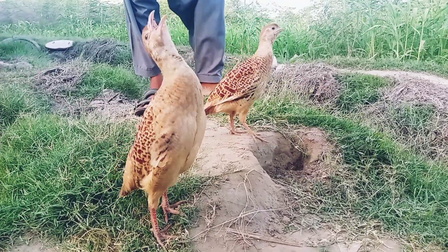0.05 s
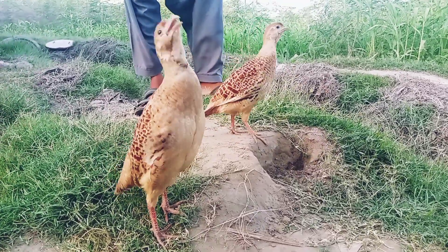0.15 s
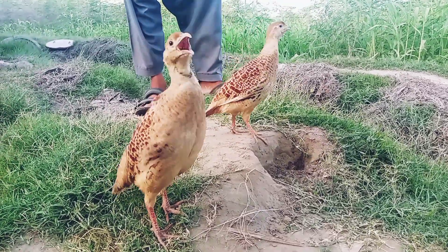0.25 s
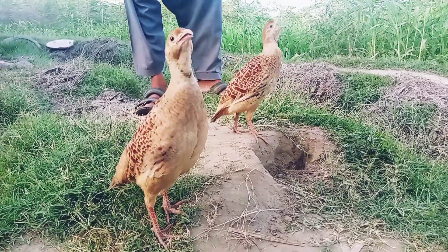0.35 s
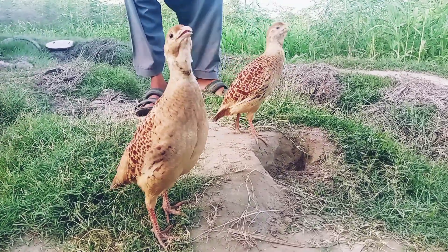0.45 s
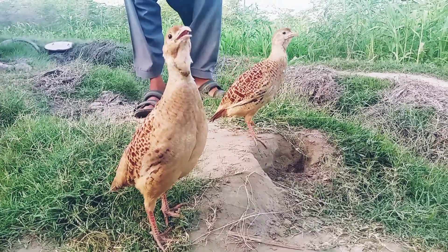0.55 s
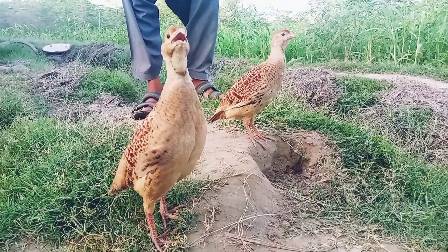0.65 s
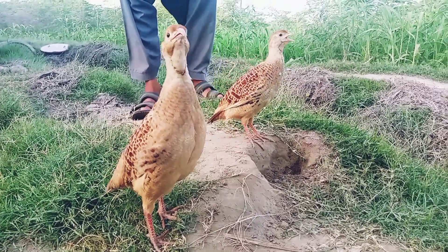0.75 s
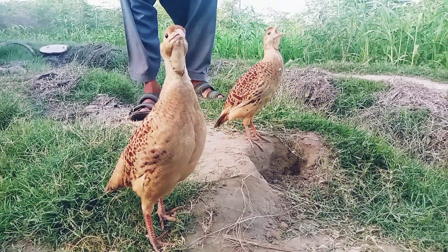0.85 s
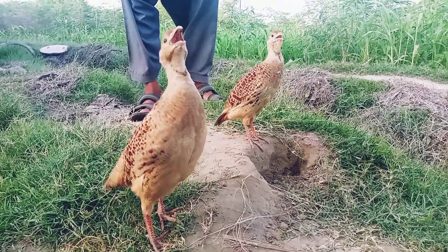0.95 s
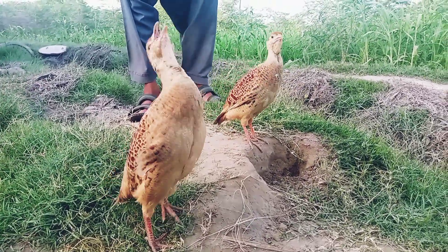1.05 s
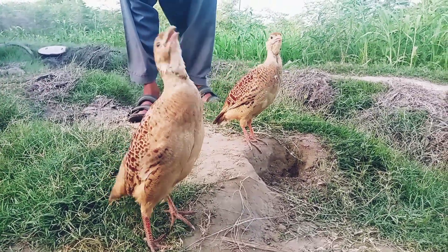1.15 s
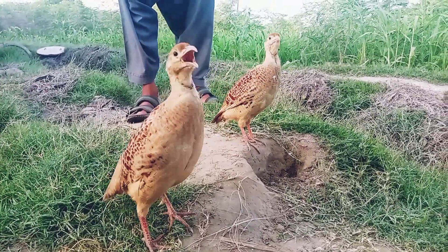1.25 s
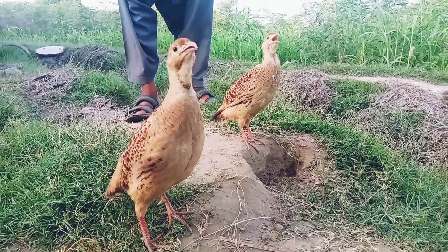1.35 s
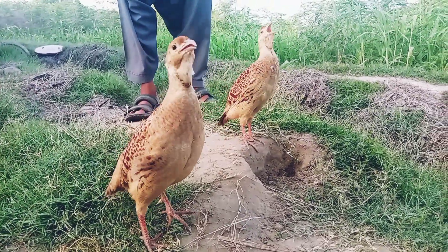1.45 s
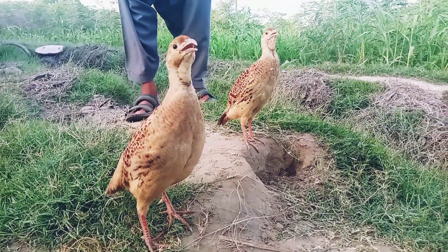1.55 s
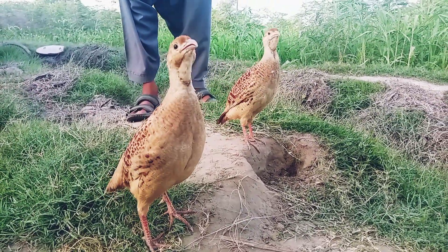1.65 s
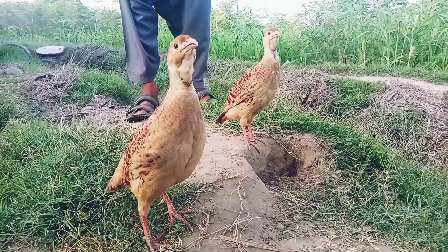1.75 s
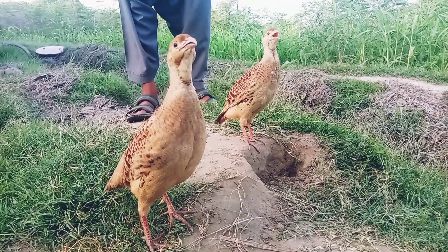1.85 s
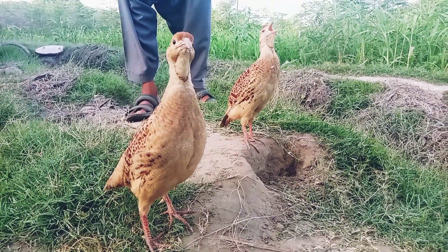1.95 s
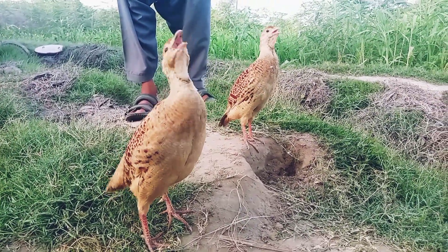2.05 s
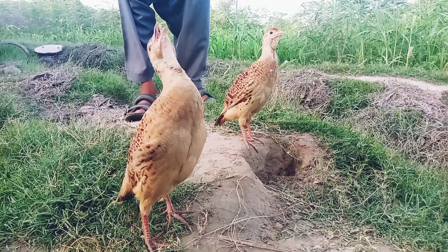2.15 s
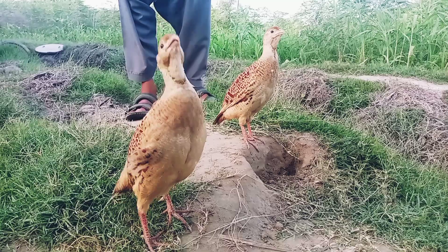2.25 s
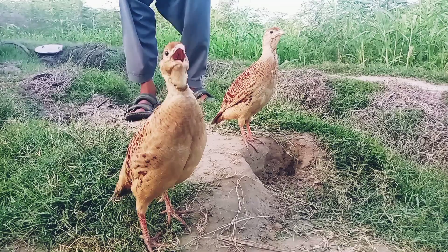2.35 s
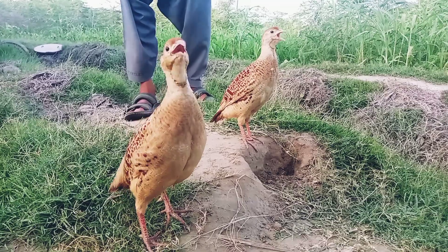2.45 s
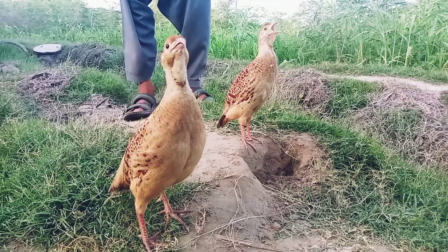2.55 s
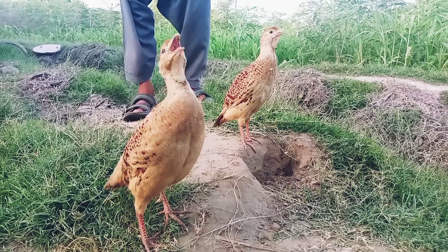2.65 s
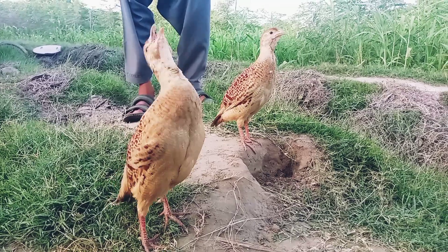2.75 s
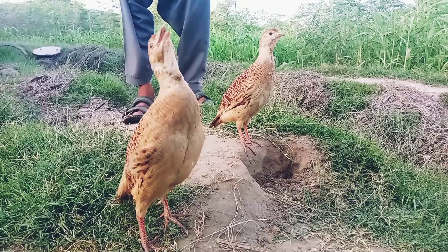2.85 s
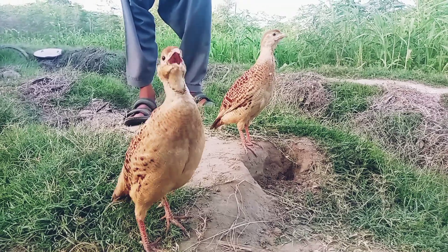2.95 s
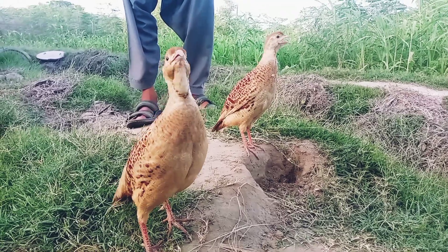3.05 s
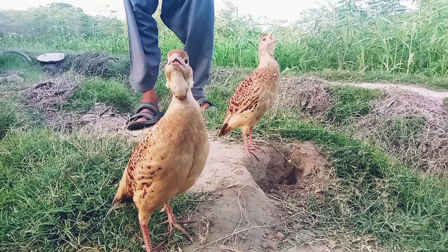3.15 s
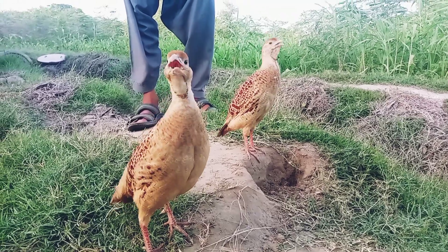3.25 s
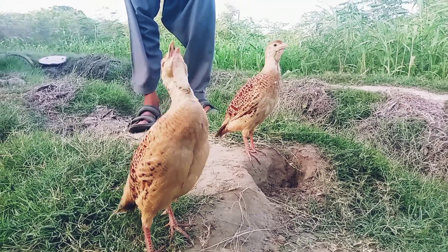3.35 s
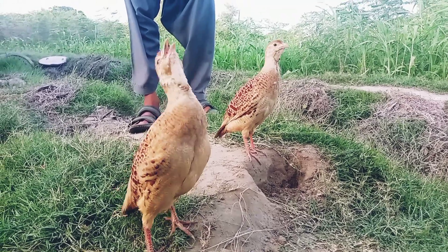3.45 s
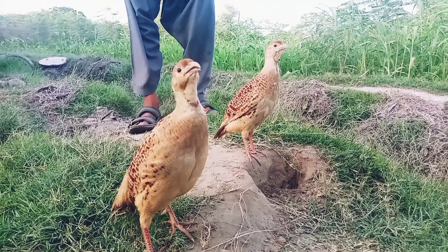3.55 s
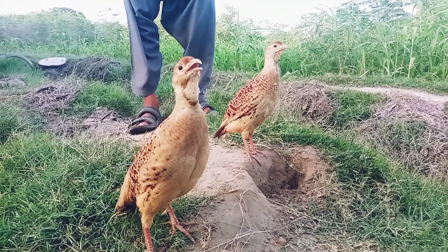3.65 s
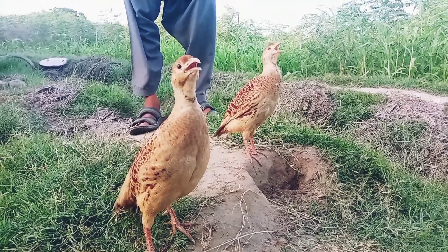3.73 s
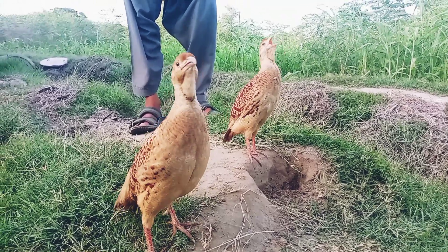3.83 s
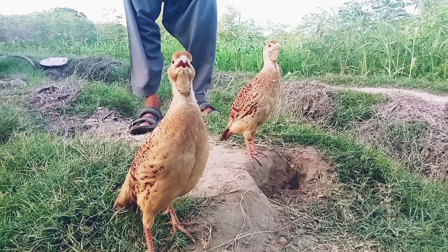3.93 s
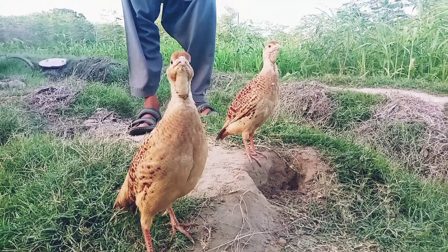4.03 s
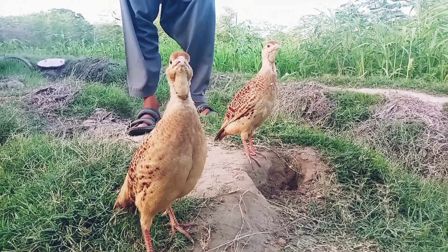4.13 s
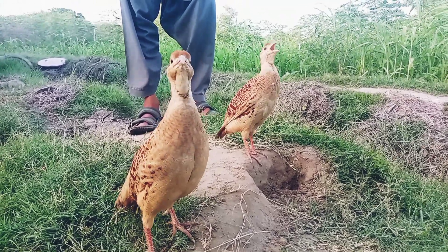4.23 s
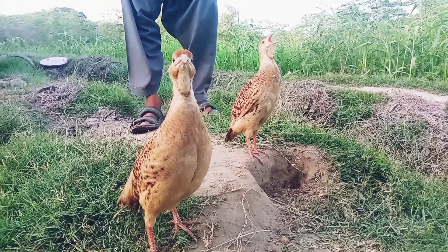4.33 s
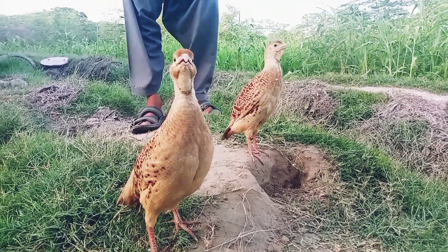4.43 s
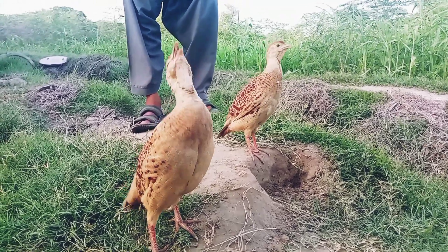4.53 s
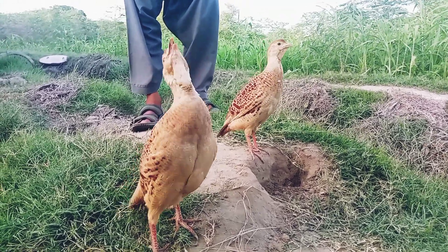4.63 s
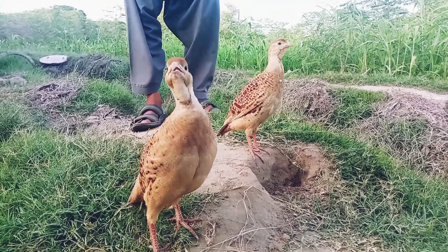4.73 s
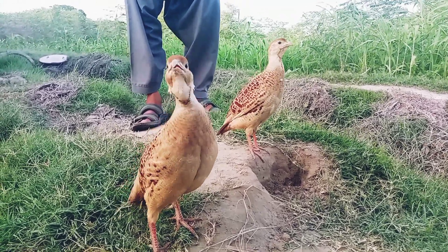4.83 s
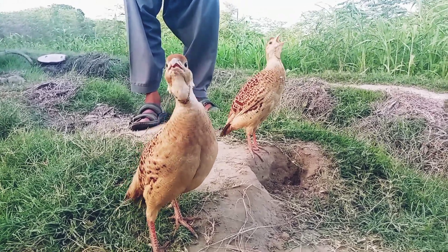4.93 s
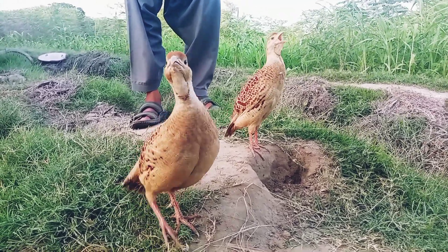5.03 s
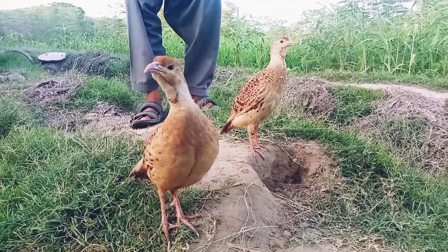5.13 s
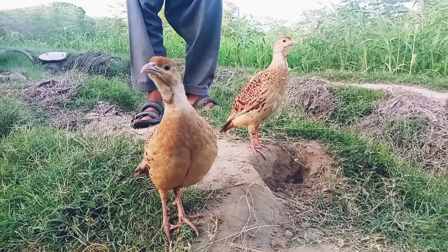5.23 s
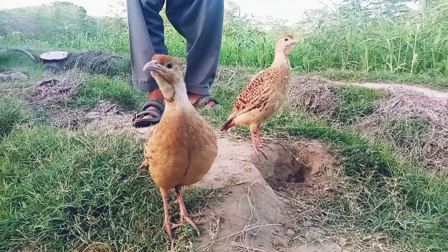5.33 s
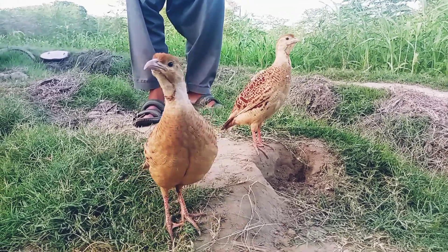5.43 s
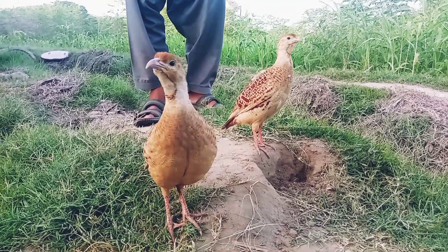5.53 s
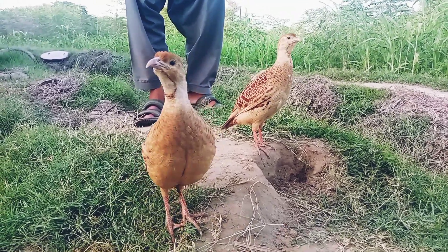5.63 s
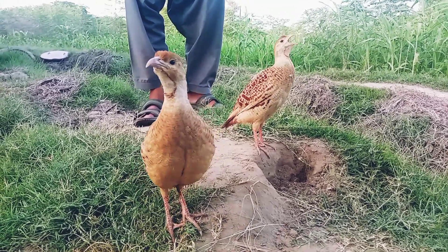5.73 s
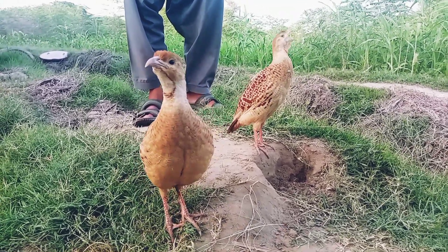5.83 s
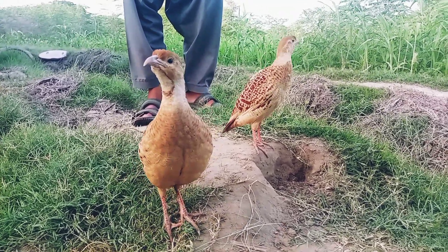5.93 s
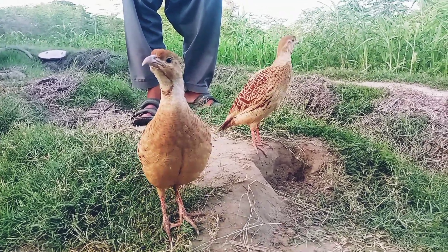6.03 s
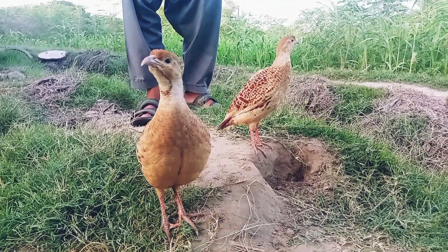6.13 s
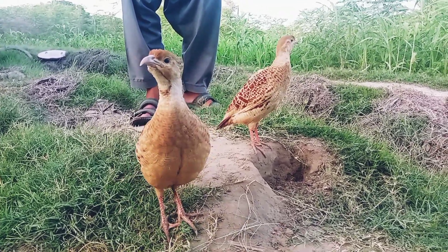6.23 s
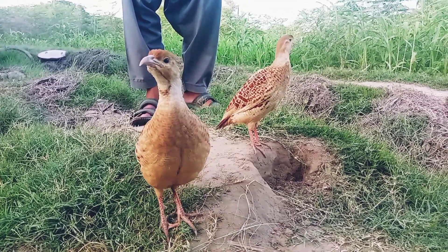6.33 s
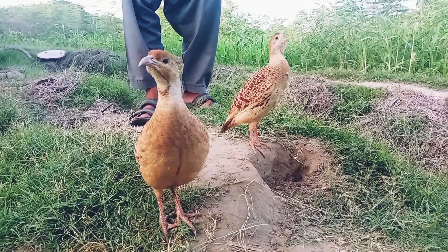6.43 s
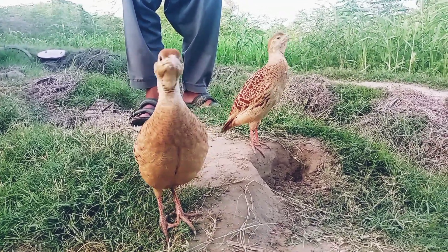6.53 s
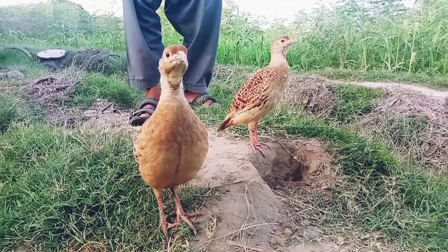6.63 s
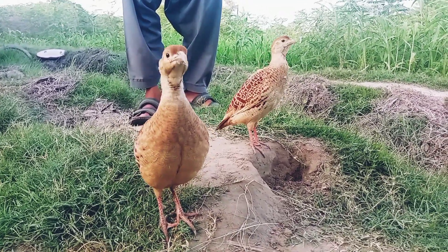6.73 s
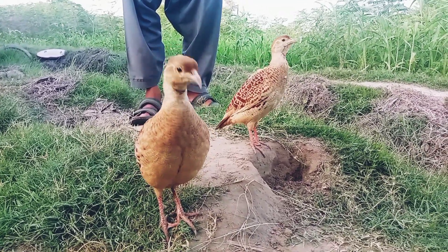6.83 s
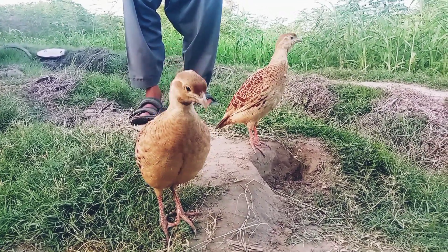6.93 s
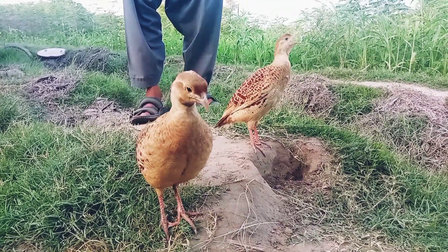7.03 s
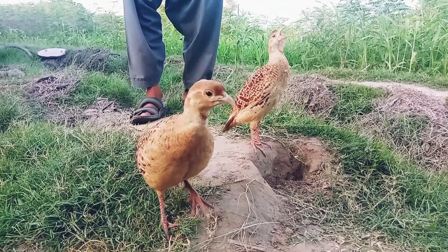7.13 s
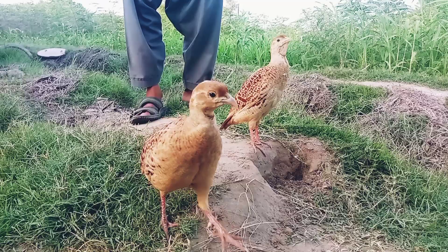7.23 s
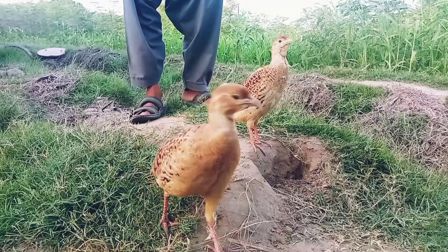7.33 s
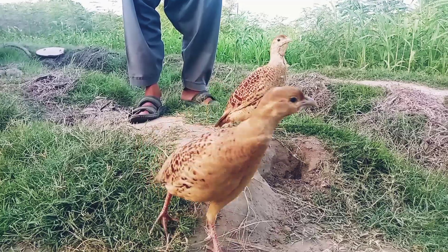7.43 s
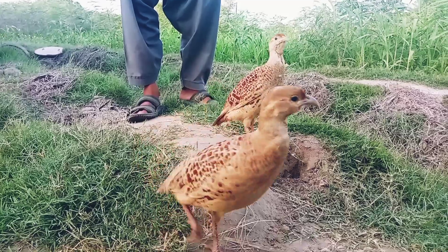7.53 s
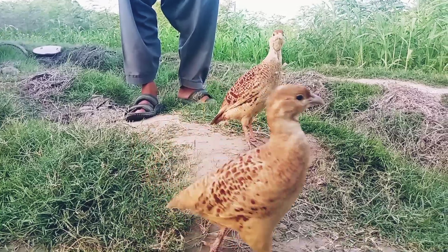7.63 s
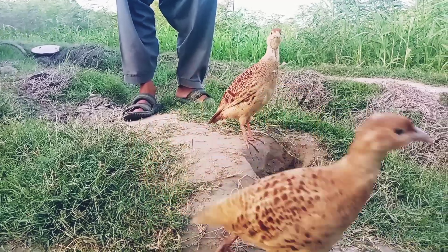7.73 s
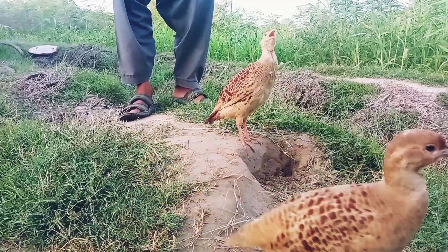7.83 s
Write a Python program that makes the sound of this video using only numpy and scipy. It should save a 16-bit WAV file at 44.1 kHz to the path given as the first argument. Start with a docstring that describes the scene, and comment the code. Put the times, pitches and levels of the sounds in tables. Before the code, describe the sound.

Loud, piercing partridge-like duet outdoors: a near bird's fast cackling phrases over a partner's sharp level notes, which continue alone, each led by a whistle.

```python
"""Francolin duet

Two francolins call on a grassy field bank, each loud note a rasp that snaps into a clean tone.
Near bird: a repeated phrase of a long falling note, short falling notes and low pulsed grunts.
Partner: sharp level notes, later alone and slower, each led by a thin whistle; one more whistle ends.
Syrinx notes are locked harmonics plus noisy membrane slaps; whistles, peeps and hums are gliding sines.
Scattered echo, open air, lumpy low rumble and intermittent hiss are shaped noise."""
import sys
import numpy as np
from scipy import signal
from scipy.fft import rfft, irfft, next_fast_len
from scipy.io import wavfile
from scipy.ndimage import uniform_filter1d, minimum_filter1d, map_coordinates

SR = 44100
rng = np.random.default_rng(int(sys.argv[2]) if len(sys.argv) > 2 else 0)


def pcm_store(signal):
    """Save signal as 16-bit PCM."""
    levels = np.round(np.clip(np.atleast_2d(signal), -1, 1) * 32767)
    wavfile.write(sys.argv[1], SR, levels.astype(np.int16).T)


N = 347508
TIME_S = np.arange(N) / SR

# long notes: snap t/s, length/s, opening yelp level/dB re LONG_DB
LONG_NOTES = [(.076, 0.11, -3), (1.101, 0.11, -23.5), (2.153, 0.11, -27), (2.783, 0.12, -18.5),
              (3.431, 0.12, -26), (4.616, 0.11, -22.5)]
# short notes: snap t/s, starting f/Hz, fundamental level/dB before its swell
SHORT_NOTES = [(.337, 1975, -17.5), (0.475, 1734, -18.5), (.6, 1721, -14.5), (.727, 1580, -23),
               (0.857, 1450, -23), (1.361, 1943, -17.5), (1.492, 1730, -22), (1.656, 1520, -24),
               (2.41, 1943, -17.5), (2.544, 1733, -21), (3.058, 1972, -19.5), (3.188, 1800, -21),
               (3.697, 1916, -18), (3.831, 1730, -20.5), (4.873, 1872, -17.5), (4.999, 1653, -23)]
# grunts: t/s, length/s, nominal pulse rate/Hz (arched from x0.5 to x1.05), level/dB
GRUNTS = [(.695, 0.075, 730, -21.5), (0.826, 0.06, 700, -24.5), (1.613, 0.083, 790, -23.5),
          (1.741, 0.074, 680, -23.5), (1.872, 0.066, 500, -31.5), (3.995, .078, 730, -23),
          (4.137, .086, 600, -25.5), (4.304, 0.064, 320, -41.5), (5.118, 0.073, 670, -29),
          (5.239, 0.064, 500, -31), (5.366, 0.077, 360, -42)]
# partner's sharp notes: snap t/s, length/s, f/Hz, fundamental level/dB
SHARP_NOTES = [(0.41, 0.086, 2348, -26), (.915, .088, 2358, -40), (1.509, 0.09, 2352, -35.5),
               (1.995, 0.089, 2323, -38), (2.566, 0.094, 2315, -31.5), (3.208, .09, 2323, -35),
               (3.852, 0.098, 2326, -31), (4.372, 0.085, 2310, -36.5), (5.031, 0.092, 2324, -34),
               (5.833, 0.095, 2307, -25), (6.497, 0.086, 2323, -32), (7.172, 0.087, 2307, -30.5)]
# partner's throat resonance, lower once it calls alone: t/s, f/Hz
PARTNER_THROAT = [(.4, 7900), (2, 8500), (5.1, 8550), (5.8, 7205)]
# thin whistles: t/s, length/s, start f/Hz, end f/Hz, level/dB
WHISTLES = [(5.502, 0.14, 2427, 2680, -49), (5.634, 0.14, 2678, 2734, -23), (6.295, .148, 2716, 2745, -20),
            (6.302, 0.16, 2220, 2370, -39), (6.963, 0.15, 2753, 2763, -23.5),
            (7.787, 0.18, 2728, 2802, -20.5)]
# soft rising peeps: t/s
PEEPS = [6.785, 7.397, 7.608]
# soft low hums: t/s, mean f/Hz, level/dB
HUMS = [(.23, 325, -61.5), (2.26, 227.5, -66.5), (2.7, 238, -65), (2.92, 218, -60), (3.74, 220, -60),
        (3.939, 339.6, -53.5), (5.35, 333.6, -49.5), (5.69, 216, -53)]

# overtones: multiple of the pitch, level/dB re the note's overtone level
LONG_OVERTONES = [(2, 3), (3, -4), (4, -10.5), (5, -29.5), (6, -50)]
SHORT_OVERTONES = [(2, -7), (3, 2.5), (4, -5.5), (5, -18), (6, -30), (7, -40.5)]
SHARP_OVERTONES = [(1.5, -41.5), (2, 0), (2.5, -38), (3, -17), (3.5, -52), (4, -23.5), (5, -38.5), (6, -56)]

# spectra of rasps and grunts: f/Hz, level/dB per Hz (relative)
NEAR_RASP = [(60, -70), (400, -41), (700, -32), (950, -15), (1300, -15.5), (2200, -4.5), (3100, 4.5),
             (3800, -6.5), (5100, -2), (6400, -9.5), (7600, -6), (9000, -17), (10200, -36.5),
             (12500, -51.5), (15500, -44)]
SHARP_RASP = [(60, -70), (450, -37.5), (610, -24.5), (800, -34), (1100, -21.5), (1750, -18.5), (2150, 3),
              (3050, -4.5), (4350, -3), (5000, -7.5), (7100, -3.5), (7900, -28), (8800, -26), (9600, -15.5),
              (10400, -32.5), (13000, -54.5), (15300, -39)]
GRUNT_COLOUR = [(50, -65), (220, -26.5), (340, -9), (550, -24.5), (760, -20), (1200, 2), (2100, 0),
                (3600, -30), (4300, -15), (5100, -16), (6500, -36.5), (15000, -59.5)]

# mean level of the low rumble: t/s, level/dB
RUMBLE_LEVEL = [(0.0, -65), (0.17, -78), (0.74, -60), (0.83, -73.5), (2.94, -71.5), (2.98, -55),
                (3.31, -72.5), (3.36, -47.5), (3.49, -88), (3.6, -49), (3.93, -71), (4.02, -51.5),
                (4.74, -71), (4.78, -52.5), (5.13, -71.5), (5.22, -60.5), (7.42, -69), (7.88, -54)]
# level of the faint hiss: t/s, level/dB
HISS_LEVEL = [(6.14, -75), (6.2, -56), (6.8, -83), (6.96, -60.5), (7.55, -79.5), (7.62, -59.5)]
# spectra of open air, hiss, rumble: f/Hz, level/dB per Hz (relative)
AIR_COLOUR = [(30, -27), (220, -15), (450, -22.5), (1000, -23), (2000, -8.5), (2800, -24.5), (15000, -43.5)]
HISS_COLOUR = [(200, -11), (2000, 0), (3200, -7.5), (7000, -5.5), (10000, -35)]
RUMBLE_COLOUR = [(20, -38), (65, -9.5), (87, 4), (110, -9.5), (220, -20), (700, -70.5)]
# spectrum of the echo tail: f/Hz, level/dB per Hz (relative)
TAIL_COLOUR = [(300, -4), (1200, -6.5), (2330, 4), (3200, -12.5), (4500, -19), (5200, -13),
               (8000, -14.5), (14000, -26.5)]

SNAP_S, UNLOCK_S = .012, .016   # 60 dB attack and release of a locked tone
# long note; leads are times before the snap
LONG_HZ, LONG_DB = 2097, -9.5
LONG_LEAD_S, YELP_LEAD_S, YELP_HALF_S = .056, .034, .008
YELP_PITCH_SHARE = .96
BREAK_FROM_S, BREAK_TO_S = .03, .057
LONG_FALL_FROM_S, LONG_FALL_SHARE = .065, .21
# short note; the slide fades near STALL_HZ and stops there
SHORT_LEAD_S, SHORT_FADE_S, STALL_HZ = .032, .017, 1250
SHORT_FALL_FROM_S, SHORT_FALL_PER_S = .007, 11.44   # rate at full effort
FULL_EFFORT_HZ = 2020
SLACK_LOSS_DB = 373   # per squared share of pitch off full effort
# sharp note; starts slightly high and settles
SHARP_DB, SHARP_LEAD_S = -11, .034
SHARP_OVERSHOOT_SHARE, SHARP_SETTLE_S = .005, .012
USUAL_FUNDAMENTAL_DB = -33
OVERTONE_TRADE = .2   # overtone dB lost per dB of extra fundamental
# soft tones
CHEST_FROM_HZ, CHEST_TO_HZ, CHEST_DB = 385, 320, -30   # level re the grunt
PEEP_S, PEEP_FROM_HZ, PEEP_TO_HZ, PEEP_DB = .058, 1310, 1660, -50.5
HUM_S = .1
# surroundings and output
AIR_DB, TAIL_T60_S, CUTOFF_HZ = -63, .47, 15900


def from_db(db):
    """Decibels to gain."""
    return 10 ** (np.asarray(db) / 20)


def rms_one(x):
    """Scale to rms 1."""
    return x / np.sqrt(np.mean(x ** 2) + 1e-20)


def follow(rows, t):
    """Interpolate each column of a curve at times t."""
    knots_s, *columns = np.transpose(rows)
    knots_s = np.maximum.accumulate(knots_s)
    return [np.interp(t, knots_s, column) for column in columns]


def coloured(x, spectrum):
    """Filter x by a spectrum of f/Hz, level/dB points; rms 1."""
    hz, db = np.transpose(spectrum)
    size = next_fast_len(2 * len(x))
    bins_hz = np.maximum(np.fft.rfftfreq(size, 1 / SR), 1)
    gain = from_db(np.interp(np.log(bins_hz), np.log(hz), db))
    return rms_one(irfft(rfft(x, size) * gain, size)[:len(x)])


def drift(t, rate_hz):
    """Smooth random curve with spread near 1."""
    knots = (t - t[0]) * rate_hz
    values = rng.standard_normal(int(knots[-1]) + 2)
    return map_coordinates(values, [knots], order=3, mode="nearest")


def add(out, start_s, sound):
    """Mix a sound in at its time."""
    i = max(round(start_s * SR), 0)
    out[i:i + len(sound)] += sound[:max(N - i, 0)]


def held(t, start, end, attack_s, release_s):
    """Level in dB: 0 from start to end, -60 one attack before and one release after."""
    return -60 * (np.maximum(start - t, 0) / attack_s + np.maximum(t - end, 0) / release_s)


def bump(t, centre, width):
    """Smooth swell of height 1."""
    return np.exp(-((t - centre) / width) ** 2)


def since(t, start, bend_s):
    """Time elapsed since start, with a rounded corner."""
    return bend_s * np.logaddexp(0, (t - start) / bend_s)


def loudest(*levels):
    """Highest of several levels at each moment."""
    return np.max(levels, axis=0)


def flutter(t, per_s, jitter, wander_hz, uneven_db, air):
    """Membranes slap at a wandering rate and uneven strength; air hisses through each opening."""
    cycles = np.cumsum(per_s * np.exp(jitter * drift(t, wander_hz))) / SR
    from_slap = (cycles % 1 - .5) * SR / per_s   # samples
    pulses = np.sinc(from_slap) * np.exp(-(from_slap / 6) ** 2)
    slaps = pulses * from_db(uneven_db * drift(t, np.mean(per_s)))
    hiss = rng.standard_normal(len(t)) * (1 - np.cos(2 * np.pi * cycles))
    return rms_one(slaps) + air * rms_one(hiss)


def windpipe(x, ring_s=.007):
    """Each slap rings briefly in the windpipe, whose fine resonances shift as the neck moves."""
    t = np.arange(0, ring_s, 1 / SR)
    rings = rng.standard_normal((2, len(t))) * from_db(-60 * t / ring_s)
    stretched, relaxed = signal.fftconvolve(x[None], rings, axes=1)[:, :len(x)]
    neck = 1.2 * drift(np.arange(len(x)) / SR, 70)
    return np.cos(neck) * stretched + np.sin(neck) * relaxed


def syrinx(t, pitch_hz, fundamental_db, overtone_db, rasp_db, per_s, overtones, rasp_colour,
           throat_hz, boost_db, width_hz):
    """Chaotic flutter or locked tone; overtones flare as they cross the throat resonance."""
    # pitch grows unsteady as rasp takes over from tone
    unlocked = 1 / (1 + from_db(np.maximum(fundamental_db, overtone_db) - rasp_db))
    hz = pitch_hz * (1 + .0025 * drift(t, 45) + .038 * unlocked * drift(t, 900))
    phase = 2 * np.pi * np.cumsum(hz) / SR
    tone = from_db(fundamental_db + .5 * drift(t, 76)) * np.sin(phase)
    for multiple, db in overtones:
        # the throat rings only once the tone has locked
        locked = np.clip(t / .015, 0, 1)
        detune = (multiple * pitch_hz - throat_hz) / width_hz
        throat_db = boost_db * locked / (1 + detune ** 2)
        shimmer_db = 3 * np.log(multiple / 2) * drift(t, 60)
        # partials halfway between harmonics come and go
        halfway = np.round(2 * multiple) % 2
        shimmer_db += 5 * halfway * drift(t, 30)
        tone += from_db(overtone_db + db + throat_db + shimmer_db) * np.sin(multiple * phase)
    slaps = flutter(t, per_s, jitter=.08, wander_hz=220, uneven_db=2.3, air=.26)
    rasp = from_db(rasp_db + drift(t, 190)) * coloured(windpipe(slaps), rasp_colour)
    return np.sqrt(2) * tone + rasp


def glide(length, start_hz, end_hz, db, waver):
    """A pure tone that swells, glides and fades."""
    t = np.arange(0, length, 1 / SR)
    hz = (start_hz + (end_hz - start_hz) * t / length) * (1 + waver * drift(t, 70))
    fade_in = np.sin(np.pi / 2 * np.minimum(t / .021, 1)) ** 2
    fade_out = np.sin(np.pi / 2 * np.minimum((length - t) / .034, 1)) ** 2
    level = np.sqrt(2) * from_db(db + .5 * drift(t, 50))
    return level * fade_in * fade_out * np.sin(2 * np.pi * np.cumsum(hz) / SR)


def long_notes(rasp_db=-14, crack_db=-24, close_db=-40, air_db=-53, bright_db=-2, flutter_per_s=960,
               yelp_thin_db=7):
    """Rasp arching into a yelp, a level tone, a crack, then a second tone that sinks and dulls."""
    out = np.zeros(N)
    for s, length, yelp_db in LONG_NOTES:
        t = np.arange(-LONG_LEAD_S - .015, length + .025, 1 / SR)
        fall_s = since(t, LONG_FALL_FROM_S, bend_s=.0049)
        fall = LONG_FALL_SHARE * fall_s / (length - LONG_FALL_FROM_S)
        crack = bump(t, (BREAK_FROM_S + BREAK_TO_S) / 2, width=.0087)
        arch = bump(t, -YELP_LEAD_S, width=.02)
        per_s = flutter_per_s + (YELP_PITCH_SHARE * LONG_HZ - flutter_per_s) * arch
        yelp_pitch = YELP_PITCH_SHARE * bump(t, -YELP_LEAD_S, width=.05)
        hz = LONG_HZ * np.where(t < -SNAP_S, yelp_pitch, 1 - fall - .15 * crack)

        yelp = yelp_db + held(t, -YELP_LEAD_S - YELP_HALF_S, -YELP_LEAD_S + YELP_HALF_S, SNAP_S, UNLOCK_S)
        first = held(t, 0, BREAK_FROM_S, SNAP_S, UNLOCK_S)
        second = held(t, BREAK_TO_S, length, SNAP_S, UNLOCK_S)
        tone = LONG_DB + loudest(yelp, first, second)

        # opening rasp eases off towards the snap and gives way to a strong yelp
        opening = rasp_db + held(t, -LONG_LEAD_S + .0054, -YELP_LEAD_S, .04, .16)
        opening += held(t, -LONG_LEAD_S, 0, SNAP_S, .011)
        opening -= 25 * from_db(yelp)
        crack_rasp = crack_db + held(t, BREAK_FROM_S + .003, BREAK_TO_S, .015, .0098)
        closing = close_db + held(t, length, length, .012, .026)
        breath = air_db + held(t, 0, length, SNAP_S, UNLOCK_S)
        rasp = loudest(opening, crack_rasp, closing, breath)

        fundamental = tone - 17 * fall - yelp_thin_db * arch
        dull_db = 39 * np.tanh(fall / .18)
        note = syrinx(t, hz, fundamental, tone + bright_db - dull_db, rasp, per_s, LONG_OVERTONES,
                      NEAR_RASP, throat_hz=4980, boost_db=33.5, width_hz=220)
        add(out, s + t[0], note)
    return out


def short_notes(rasp_db=-13, air_db=-48, overtone_db=-13, swell_db=7.0, flutter_per_s=1400,
                flutter_rise_per_s=24):
    """Swelling, quickening rasp snaps into a bright tone that slides down and turns pure."""
    out = np.zeros(N)
    for s, pitch_hz, db in SHORT_NOTES:
        effort = pitch_hz / FULL_EFFORT_HZ
        force_db = -SLACK_LOSS_DB * (1 - effort) ** 2
        fall_per_s = SHORT_FALL_PER_S * effort
        length = SHORT_FALL_FROM_S + np.log(pitch_hz / STALL_HZ) / fall_per_s
        t = np.arange(-SHORT_LEAD_S - .005, length + .055, 1 / SR)
        ratio = np.exp(-fall_per_s * since(t, SHORT_FALL_FROM_S, bend_s=.0027))
        # gate opens with the rasp, shuts when the slide ends
        stall = held(t, -SHORT_LEAD_S, length, .005, .0179)
        tone = held(t, .00067, length - SHORT_FADE_S, SNAP_S, release_s=.14) + stall
        opening = rasp_db + held(t, -.015, -.0024, .041, .0061)
        rasp = loudest(opening, air_db + tone) + stall
        dull_db = 33 * np.tanh((1 - ratio) / .18)
        fundamental = db + tone + swell_db * bump(t, .6 * length, width=.009)
        per_s = flutter_per_s * np.exp(flutter_rise_per_s * np.minimum(t, 0))
        note = syrinx(t, pitch_hz * ratio, fundamental, overtone_db + force_db + tone - dull_db,
                      rasp + force_db, per_s, SHORT_OVERTONES, NEAR_RASP,
                      throat_hz=6260, boost_db=9.5, width_hz=170)
        add(out, s + t[0], note)
    return out


def grunts():
    """At low pressure the membranes only flap slowly, fastest mid-grunt; the chest hums beneath."""
    out = np.zeros(N)
    for s, length, per_s, db in GRUNTS:
        t = np.arange(0, length, 1 / SR)
        arch = np.sin(np.pi * t / length)
        slaps = flutter(t, per_s * (.5 + .55 * arch), jitter=.03, wander_hz=220, uneven_db=2.5, air=.32)
        add(out, s, from_db(db) * arch ** 1.5 * coloured(windpipe(slaps), GRUNT_COLOUR))
        add(out, s + .012, glide(length, CHEST_FROM_HZ, CHEST_TO_HZ, db + CHEST_DB, waver=.049))
    return out


def sharp_notes(rasp_db=-15.5, dip_db=3.5, close_db=-17, air_db=-58, flutter_per_s=1650, droop_per_s=2.8):
    """Rasp, level tone led by its second harmonic, closing rasp as the pitch lets go."""
    out = np.zeros(N)
    for s, length, pitch_hz, low_db in SHARP_NOTES:
        t = np.arange(-SHARP_LEAD_S - .016, length + .061, 1 / SR)
        overshoot = SHARP_OVERSHOOT_SHARE * np.exp(-np.abs(t) / SHARP_SETTLE_S)
        ratio = 1 + overshoot - droop_per_s * since(t, length, bend_s=.0023)
        tone = held(t, .0049, length, SNAP_S, UNLOCK_S)
        opening = rasp_db + held(t, -SHARP_LEAD_S, 0, .03, .02) - dip_db * bump(t, -.013, width=.0099)
        closing = close_db + held(t, length + .0047, length + .005, .0083, .05)
        rasp = loudest(opening, closing, air_db + tone)
        rasp += held(t, -SHARP_LEAD_S - .009, t[-1], .004, .01)
        fundamental = low_db + held(t, .0026, length + .006, SNAP_S, release_s=.059)
        overtone_db = SHARP_DB - OVERTONE_TRADE * (low_db - USUAL_FUNDAMENTAL_DB)
        throat_hz, = follow(PARTNER_THROAT, s)
        note = syrinx(t, pitch_hz * ratio, fundamental, overtone_db + tone, rasp, flutter_per_s,
                      SHARP_OVERTONES, SHARP_RASP, throat_hz, boost_db=13.5, width_hz=1100)
        add(out, s + t[0], note)
    return out


def whistles():
    """Thin whistles: nearly steady gliding sines."""
    out = np.zeros(N)
    for s, length, start_hz, end_hz, db in WHISTLES:
        add(out, s, glide(length, start_hz, end_hz, db, waver=.0016))
    return out


def peeps():
    """Soft peeps: brief rising sines."""
    out = np.zeros(N)
    for s in PEEPS:
        add(out, s, glide(PEEP_S, PEEP_FROM_HZ, PEEP_TO_HZ, PEEP_DB, waver=.004))
    return out


def hums():
    """Soft hums: low sines of wavering pitch."""
    out = np.zeros(N)
    for s, hz, db in HUMS:
        add(out, s, glide(HUM_S, hz, hz, db, waver=.073))
    return out


def field_echo(x, near_db, far_db):
    """Ground and bank scatter the calls at once; the tall crop returns a faint, duller tail."""
    t = np.arange(int(SR * .8)) / SR
    near = rng.standard_normal(len(t)) * from_db(-60 * t / .06) * (t > .003)
    far = coloured(rng.standard_normal(len(t)), TAIL_COLOUR)
    far = far * from_db(-60 * t / TAIL_T60_S) * (t > .02)
    response = from_db(near_db) * rms_one(near) + from_db(far_db) * rms_one(far)
    return signal.fftconvolve(x, response / np.sqrt(len(t)))[:N]


def background():
    """Quiet open air, a lumpy low rumble and a faint hiss that comes and goes: coloured noise."""
    white = rng.standard_normal((3, N))
    rumble_db = follow(RUMBLE_LEVEL, TIME_S)[0] + 4 * drift(TIME_S, 10)
    rumble = from_db(rumble_db) * coloured(white[0], RUMBLE_COLOUR)
    hiss = from_db(follow(HISS_LEVEL, TIME_S)[0]) * coloured(white[1], HISS_COLOUR)
    air = from_db(AIR_DB) * coloured(white[2], AIR_COLOUR)
    return rumble + hiss + air


def scene():
    """Both birds and the soft tones, with their echo, in the open field."""
    near = long_notes() + short_notes() + grunts()
    calls = near + sharp_notes() + whistles() + peeps() + hums()
    return (calls + field_echo(calls, near_db=-15, far_db=-49) + background())[None]


def record(dry):
    """A fast limiter holds peaks near full scale; a steep low-pass cuts the top."""
    gain = minimum_filter1d(1 / np.maximum(np.abs(dry), 1), size=180)
    limited = dry * uniform_filter1d(gain, size=180)
    low_pass = signal.ellip(10, .1, 80, CUTOFF_HZ, fs=SR, output="sos")
    return signal.sosfilt(low_pass, .97 * limited)


dry = scene()
out = record(dry)
pcm_store(out)
```